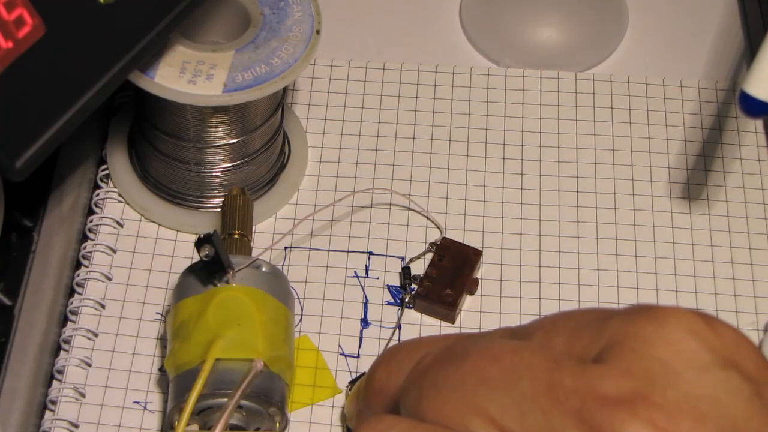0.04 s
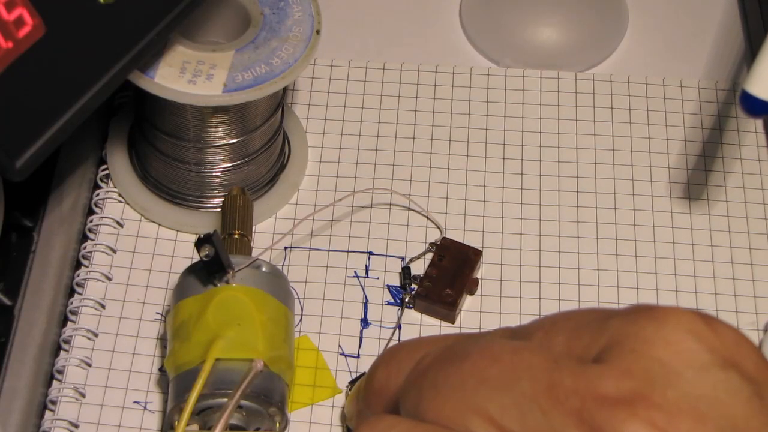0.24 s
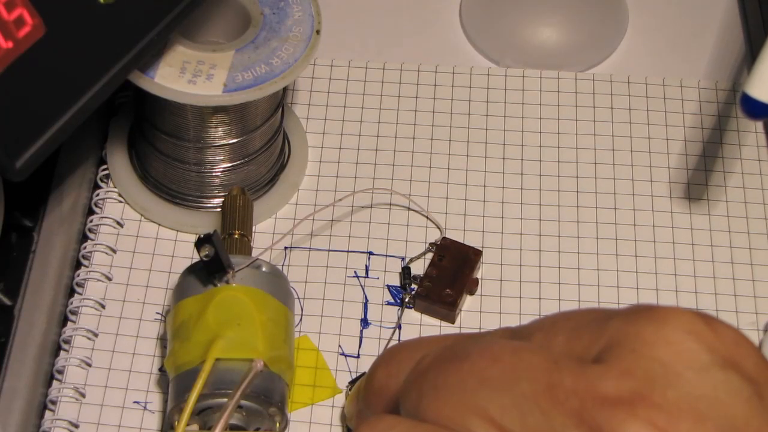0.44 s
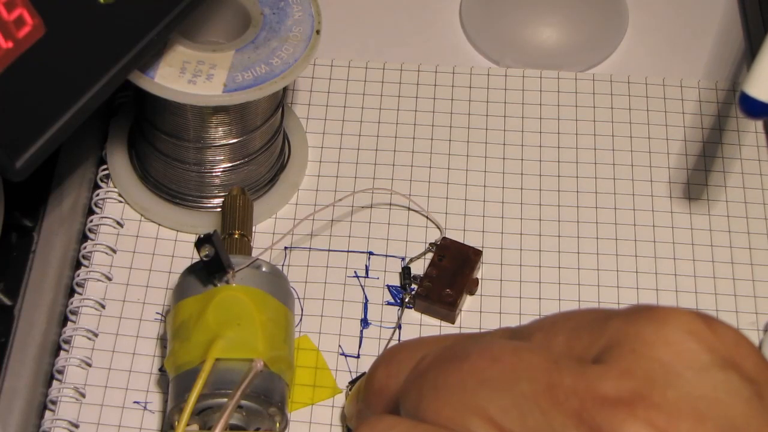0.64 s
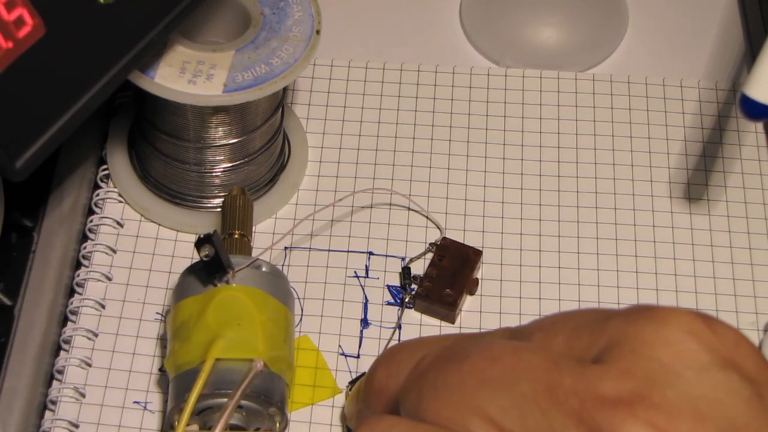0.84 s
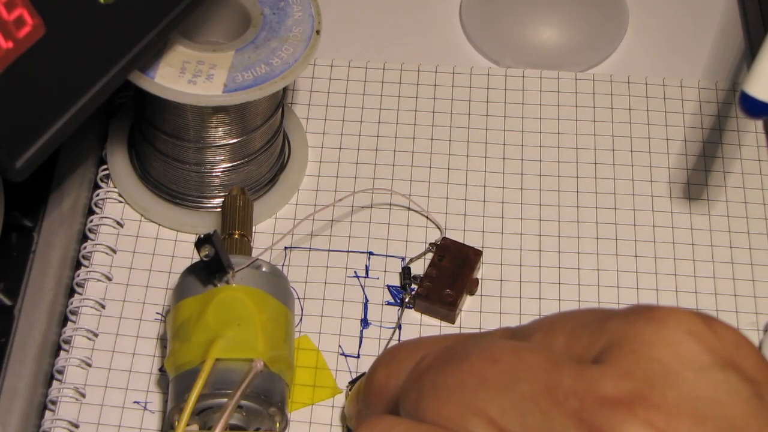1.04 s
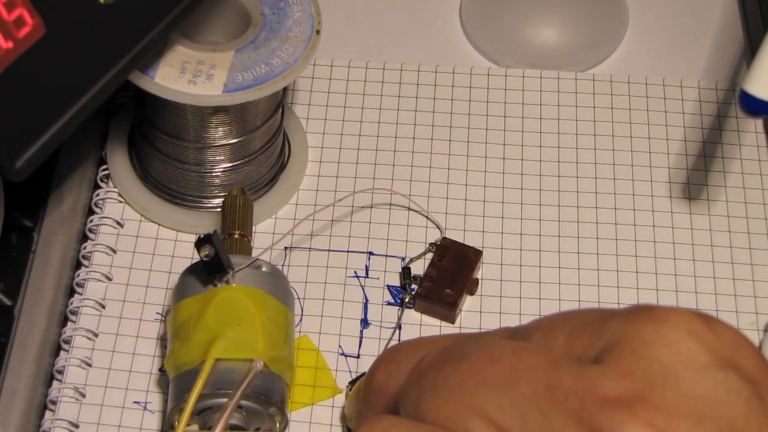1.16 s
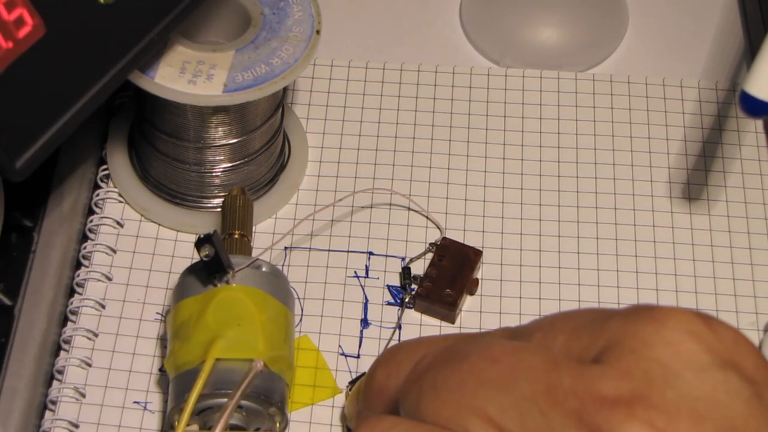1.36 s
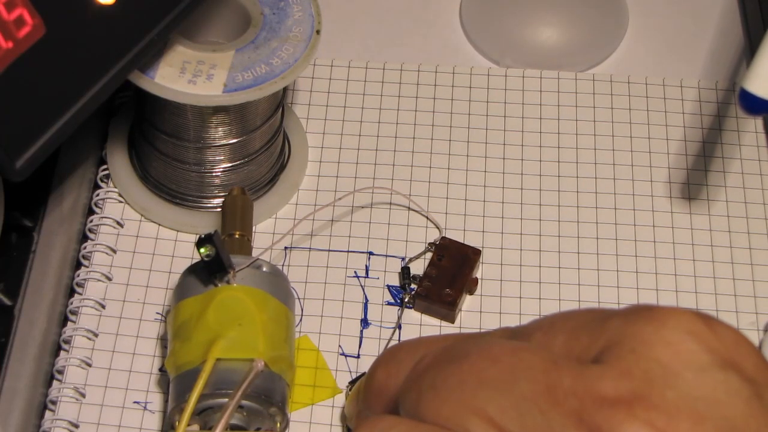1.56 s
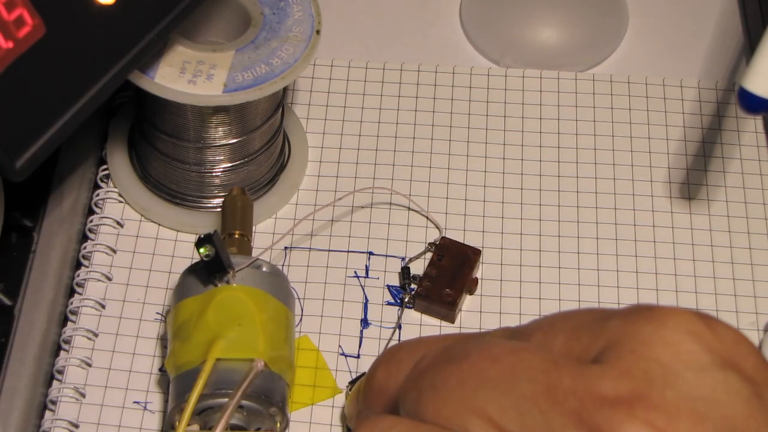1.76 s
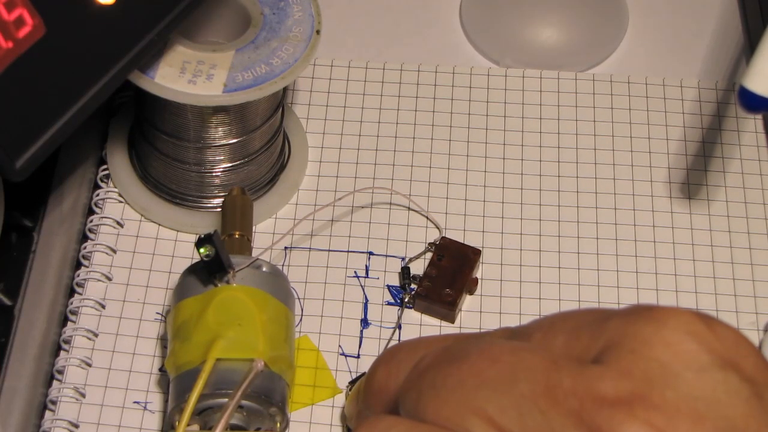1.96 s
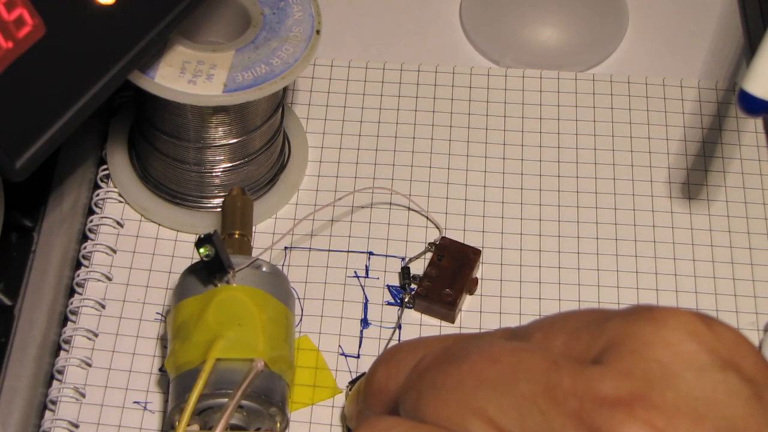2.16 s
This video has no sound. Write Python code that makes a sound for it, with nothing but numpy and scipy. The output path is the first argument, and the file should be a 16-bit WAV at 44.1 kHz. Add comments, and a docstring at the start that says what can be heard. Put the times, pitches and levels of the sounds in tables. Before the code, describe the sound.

A single sharp relay click snaps close by over faint low electrical hum and room noise

```python
"""Room tone runs throughout: mains hum as wavering sines, fan drones and ventilation as shaped noise.
Faint desk ticks, damped sines, come near 0.5 s; from 1.2 s a little motor's brush noise swells, ticking.
At 1.47 s a relay snaps shut close to a camera: its contacts strike and bounce, exciting damped modes,
and a noise rattle dies away. The camera's gain control ducks at the snap and creeps back,
over a steady preamplifier hiss; more desk ticks fall after 2 s."""
import sys
import numpy as np
from scipy import signal
from scipy.fft import rfft, irfft, next_fast_len
from scipy.io import wavfile
from scipy.ndimage import minimum_filter1d, map_coordinates

SR = 44100
rng = np.random.default_rng(int(sys.argv[2]) if len(sys.argv) > 2 else 0)


def digitize_waveform(pressure):
    """Quantize a signal to 16-bit integers and store it at the path in sys.argv[1].

    Rows of a 2-D input are taken as channels; values are limited to [-1, 1].
    """
    field = np.atleast_2d(pressure).T
    bounded = np.clip(field, -1, 1)
    quanta = np.round(bounded * 32767).astype(np.int16)
    wavfile.write(sys.argv[1], SR, quanta)


N = 96579  # samples

SIDE_DB = -12.5  # side signal of the hum and fan tones, relative to mid


def amp(db):
    """Decibels to amplitude ratio: 20 dB per factor of ten."""
    return 10 ** (np.asarray(db) / 20)


def unit(x):
    """Normalisation to an rms of 1, so that a later gain sets the level."""
    return x / np.sqrt(np.mean(x ** 2) + 1e-20)


def along(points, hz):
    """Interpolation of (frequency_hz, value) points on a logarithmic frequency axis."""
    point_hz, values = np.transpose(points)
    return np.interp(np.log(hz + 1), np.log(point_hz + 1), values)


def wobble(knots_per_s):
    """Random modulation: a smooth spline through Gaussian knots."""
    knots = rng.standard_normal(int(N * knots_per_s / SR) + 4)
    return map_coordinates(knots, [np.arange(N) * knots_per_s / SR])


def filtered(x, response):
    """Linear filtering: multiplication of the spectrum by a response of frequency."""
    padded = next_fast_len(N + SR // 2)
    hz = np.fft.rfftfreq(padded, 1 / SR)
    return irfft(rfft(x, padded) * response(hz), padded)[..., :N]


def left_right(mid, side):
    """Mid-side decoding: sum to the left, difference to the right."""
    return np.array([mid + side, mid - side])


def noise(spectrum, alike):
    """Partly coherent stereo noise of rms 1: the mid-side balance sets the left-right correlation."""
    def mid_side_response(hz):
        angle = np.arccos(np.clip(along(alike, hz), -1, 1)) / 2
        return amp(along(spectrum, hz)) * np.array([np.cos(angle), np.sin(angle)])

    mid, side = filtered(rng.standard_normal((2, N)), mid_side_response)
    return unit(left_right(mid, side))


def ring(start_s, hz, db, t60_s, pan_db):
    """Damped resonance: a sine with a short rise and exponential decay, heard at two ports."""
    left_lag_s, rise_cycles = .000035, 2
    t = np.clip(np.arange(N) / SR - start_s - np.array([[left_lag_s], [0]]), 0, 1)
    port_db = pan_db / 2 * np.array([[1], [-1]])
    decay = amp(db + port_db - 60 * t / t60_s)
    rise = 1 - np.exp(-t * hz / rise_cycles)
    return decay * rise * np.sin(2 * np.pi * hz * t)


def hum():
    """Mains harmonics: sines whose phase drifts, with level wavering in the mid signal."""
    # mains tones: pitch_hz, level_db (rms before wavering), waver_db
    mains_tones = [(49.6, -61, 2), (100, -55, 3.5), (296.4, -65.5, 3)]
    t = np.arange(N) / SR

    def tone(hz, db):
        cycles = hz * t + rng.random() + 0.045 * wobble(5.3)
        return np.sqrt(2) * amp(db) * np.sin(2 * np.pi * cycles)

    mid = sum(tone(hz, db + waver_db * wobble(5.0)) for hz, db, waver_db in mains_tones)
    side = sum(tone(hz, db + SIDE_DB) for hz, db, _ in mains_tones)
    return left_right(mid, side)


def fan():
    """Narrow-band noise: resonance-shaped spectra give blurred tones, nearly alike at both ports."""
    # fan tones: pitch_hz, width_hz, level_db (rms before the mid-side balance)
    drones = [(143, 12, -66.5), (207, 13, -61.5), (401, 8.3, -70.5), (601.7, 41, -64)]

    def band(hz, width_hz):
        resonance = lambda f: 1 / (1 + (2 * (f - hz) / width_hz) ** 2)
        return unit(filtered(rng.standard_normal((2, N)), resonance))

    bands = sum(amp(db) * band(hz, width_hz) for hz, width_hz, db in drones)
    mid, side = bands * amp([[0], [SIDE_DB]])
    return left_right(mid, side)


def rush():
    """Broadband noise of ventilation and distant machines: shaped spectrum, slow level modulation."""
    # rush spectrum: frequency_hz, relative_density_db (per Hz)
    rush_spectrum = [(12, -39.5), (20, -13), (48, -11.5), (112, -2), (160, -5.5), (285, -7.5), (507, -14),
                     (597, -14.5), (648, -13.5), (1290, -18), (1640, -24.5), (3200, -28), (9760, -35),
                     (13900, -40)]
    # left-right likeness: frequency_hz, correlation (no unit)
    likeness = [(60, 0.59), (130, 0.79), (280, 0.73), (610, 0.73), (1320, 0.29), (2870, 0.12), (6220, 0.02),
                (13500, 0.18)]
    # left-right balance: frequency_hz, left_over_right_db
    balance = [(60, -1.1), (230, 1), (900, -1.0), (3480, -0.5), (13500, 0.5)]
    lean = lambda hz: amp(along(balance, hz) / 2 * np.array([[1], [-1]]))
    breathing = amp(-50 + 1.68 * wobble(4.22))  # dB
    return breathing * filtered(noise(rush_spectrum, likeness), lean)


def desk():
    """Impulse response of small bodies: each faint tick is a sum of one or more damped modes."""
    # modes of the desk ticks: start_s, level_db, pitch_hz, t60_s, left_over_right_db
    desk_ticks = [(.528, -53.5, 2460, 0.054, -7), (.549, -50, 2490, 0.027, 0),
                  (2.065, -33.5, 2260, 0.013, -8), (2.064, -40, 2900, 0.011, -7),
                  (2.065, -48, 1360, .02, 0), (2.065, -51, 5870, 0.0093, -13),
                  (2.065, -46, 8800, 0.0055, 2), (2.15, -45, 8650, .006, 1)]
    return sum(ring(start_s, hz, db, t60_s, pan_db) for start_s, db, hz, t60_s, pan_db in desk_ticks)


def motor():
    """Amplitude modulation: brush noise fades in and flares at a constant rate, once a turn."""
    # brush noise spectrum: frequency_hz, relative_density_db (per Hz)
    brush_spectrum = [(800, -32.5), (1500, -14), (2300, 11.5), (3200, -3.5), (4500, -21), (7500, 1.5),
                      (11000, -8.5), (14000, -6)]
    on_s, swell_s = 1.2, .4
    turns_per_s, tick_s = 22.3, 1.9  # tick_s: the moment of one tick, which sets the phase
    level_db, tick_depth_db, tick_sharpness = -66.5, 6, 6
    t = np.arange(N) / SR
    swell = np.clip((t - on_s) / swell_s, 0, 1)
    flare = np.cos(np.pi * turns_per_s * (t - tick_s)) ** 2
    gain = swell * amp(level_db + tick_depth_db * flare ** tick_sharpness)
    return gain * noise(brush_spectrum, [(1000, .6), (3000, .5), (8000, 0.22)])


def rattle():
    """Frequency-dependent damping: clumpy noise of springs and desk, each band decaying at its own rate."""
    # rattle spectrum: frequency_hz, relative_density_db (per Hz)
    rattle_spectrum = [(300, -46.5), (600, -19.5), (1100, -12), (1700, -25), (2200, -9), (3000, -13),
                       (4000, -9), (5300, -5), (9000, -3.5), (12300, -10), (13900, -10)]
    # rattle decay: frequency_hz, t60_s
    rattle_decay = [(500, 0.14), (1000, 0.085), (2000, 0.15), (5000, 0.16), (9000, .13), (14000, 0.23)]
    start_s, level_db = 1.477, -16
    clumps_db, clumps_per_s = 2.5, 590
    steady = noise(rattle_spectrum, [(1000, .6), (8000, .2)])
    hz, t, bands = signal.stft(steady, SR, nperseg=64)
    after_s = t - start_s
    decay_db = -60 * np.clip(after_s, 0, 1) / along(rattle_decay, hz)[:, None]
    fade = (after_s > 0) * amp(level_db + decay_db)
    fading = signal.istft(bands * fade, SR, nperseg=64)[1][:, :N]
    return amp(clumps_db * wobble(clumps_per_s)) * fading


def relay():
    """Modal excitation: every contact rings the same modes, with levels scattered at random."""
    # armature leaving, striking and bouncing: start_s, level_db (added to each mode)
    contacts = [(1.4716, -14), (1.4736, 7), (1.4751, -3), (1.4761, -12), (1.4778, -12), (1.4793, -10)]
    # modes of the relay: pitch_hz, level_db, t60_s, left_over_right_db
    modes = [(606, -35.5, .08, -3.5), (798, -34, 0.071, -4), (995, -30, 0.071, -5),
             (1147, -32.5, 0.057, -4.5), (2236, -41, 0.023, -3), (3420, -22.5, 0.0039, -5.5),
             (4830, -11.5, 0.0027, -4.5), (5238, -3.5, .004, -5), (5590, -11, 0.004, -2.5),
             (7050, -7, 0.0035, 0), (8440, -9.5, 0.0027, -1), (9354, -5.5, 0.0048, 3),
             (10800, -15.5, 0.003, 1), (11530, -15.5, 0.005, -6.5), (13250, -23, 0.0039, -10)]
    scatter_db = 1.5 * rng.standard_normal((len(contacts), len(modes)))
    snap = 0
    for (start_s, contact_db), row_db in zip(contacts, scatter_db):
        for (hz, mode_db, t60_s, pan_db), chance_db in zip(modes, row_db):
            snap = snap + ring(start_s, hz, contact_db + mode_db + chance_db, t60_s, pan_db)
    return snap


def scene():
    """Superposition: the sound pressures of all sources add."""
    return relay() + rattle() + desk() + hum() + fan() + rush() + motor()


def trailing(x, seconds):
    """Causal smoothing: the mean over the last few samples."""
    size = max(round(seconds * SR), 1)
    return np.convolve(x, np.ones(size) / size)[:N]


def gain_reduction_db(dry):
    """Automatic gain control: peaks over a threshold duck the level, which holds, then recovers steadily."""
    threshold_db, recover_db_per_s = -7, 23.5
    hold_s, attack_s, ease_s = 0.033, 0.0062, 0.071
    t = np.arange(N) / SR
    peak_db = 20 * np.log10(np.abs(dry).max(0) + 1e-9)
    over_db = np.maximum(peak_db - threshold_db, 0)
    # each loud peak starts a straight recovery line; the highest line rules
    lines_db = np.where(over_db > 0, over_db + recover_db_per_s * (t + hold_s), 0)
    recovery_db = np.maximum.accumulate(lines_db) - recover_db_per_s * t
    # the largest recent excess caps the line, which makes the hold
    window = round((hold_s + 1) * SR)
    padded = np.pad(-over_db, (window, 0))
    cap_db = -minimum_filter1d(padded, size=window, origin=(window - 1) // 2)[window:]
    duck_db = np.clip(np.minimum(recovery_db, cap_db), 0, None)
    return np.maximum(trailing(duck_db, attack_s), trailing(duck_db, ease_s))


def record(dry):
    """Signal chain: gain control, added preamplifier hiss, clipping at full scale and a band limit."""
    # preamplifier hiss spectrum: frequency_hz, relative_density_db (per Hz)
    hiss_spectrum = [(1000, 6.5), (4000, -3.5), (9000, -7), (14000, -9)]
    hiss = amp(-66.5) * noise(hiss_spectrum, [(1000, 0.0062)])
    wet = dry * amp(-gain_reduction_db(dry)) + hiss
    top_hz, slope_hz = 14400, 600
    band_limit = lambda hz: np.clip((top_hz - hz) / slope_hz, .004, 1)
    return np.clip(filtered(np.clip(wet, -1, 1), band_limit), -1, 1)


dry = scene()
out = record(dry)
digitize_waveform(out)
```